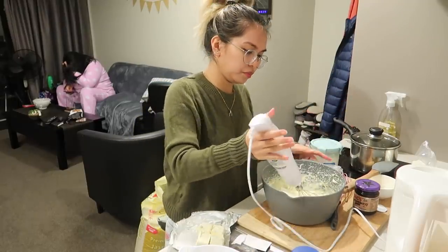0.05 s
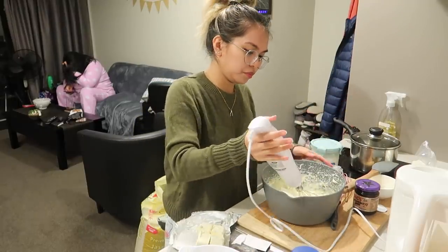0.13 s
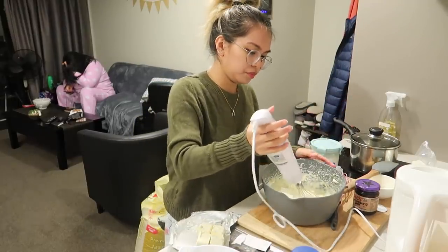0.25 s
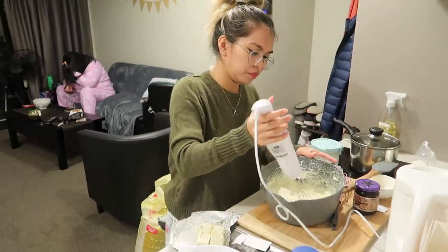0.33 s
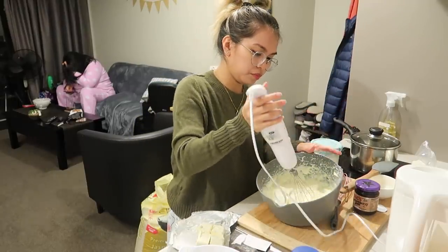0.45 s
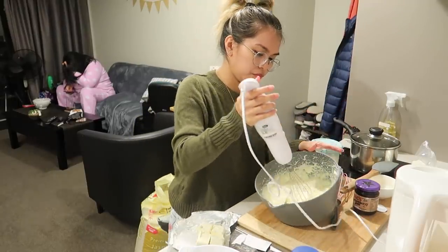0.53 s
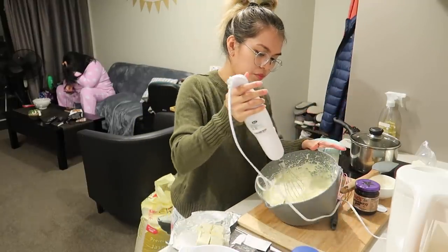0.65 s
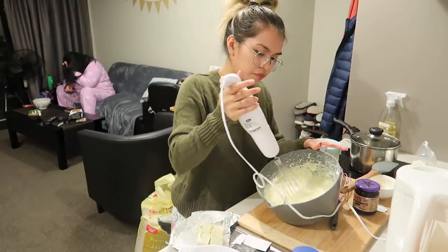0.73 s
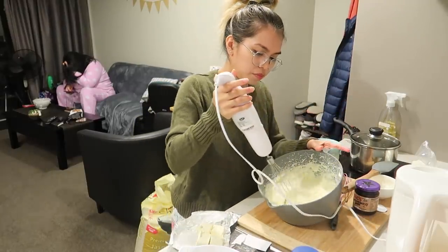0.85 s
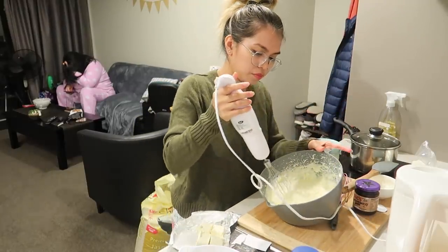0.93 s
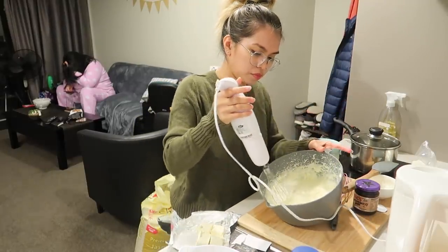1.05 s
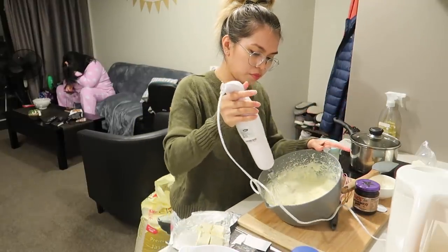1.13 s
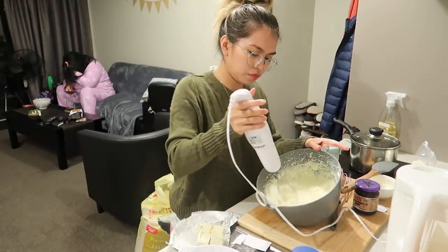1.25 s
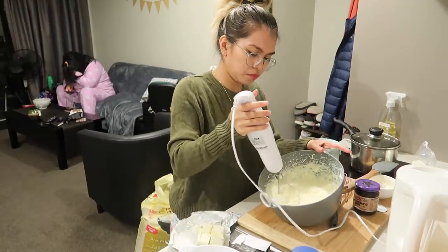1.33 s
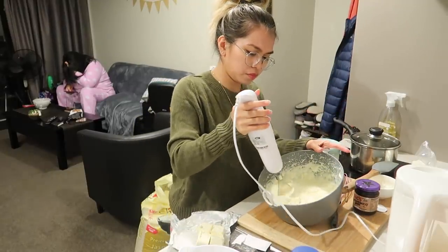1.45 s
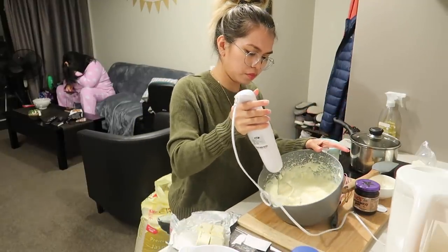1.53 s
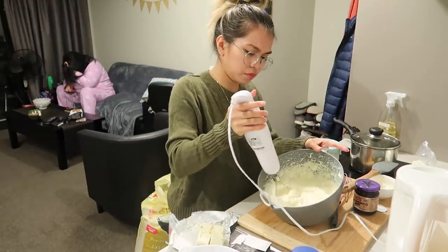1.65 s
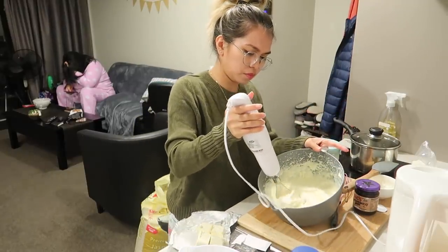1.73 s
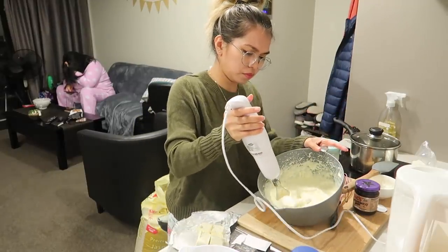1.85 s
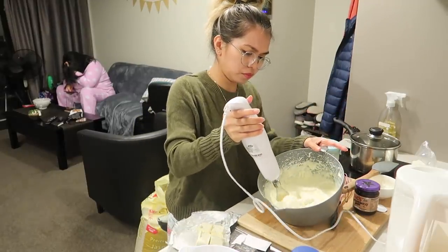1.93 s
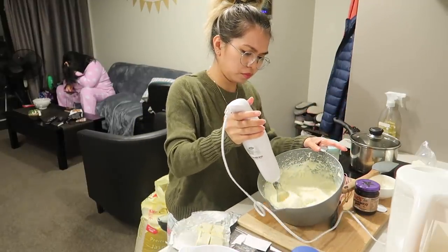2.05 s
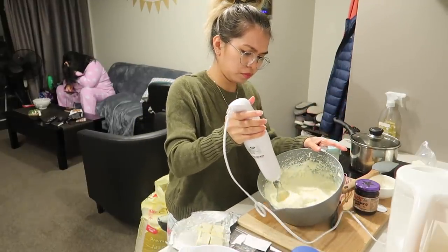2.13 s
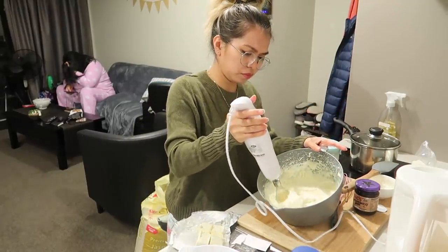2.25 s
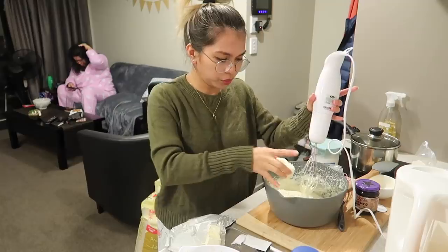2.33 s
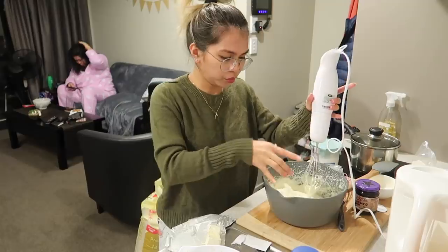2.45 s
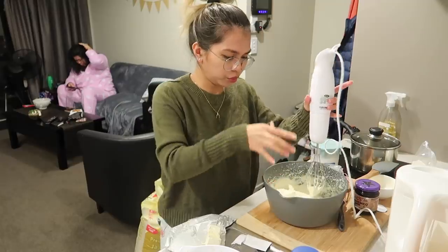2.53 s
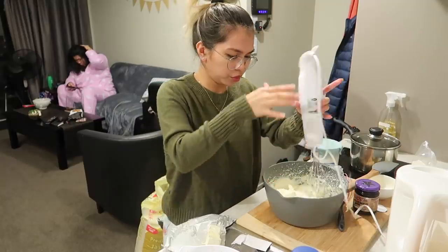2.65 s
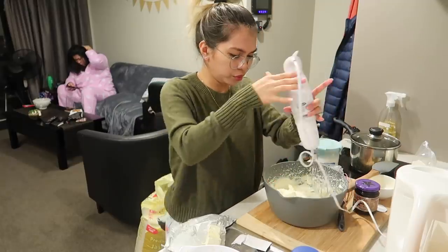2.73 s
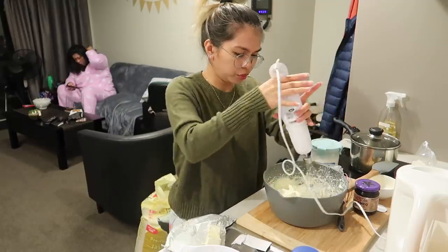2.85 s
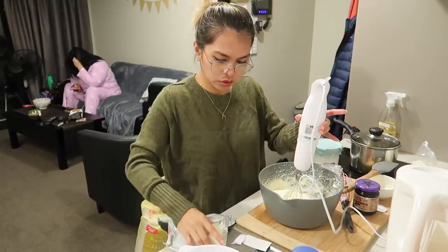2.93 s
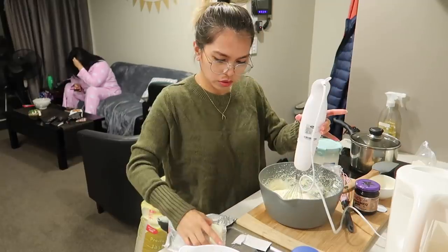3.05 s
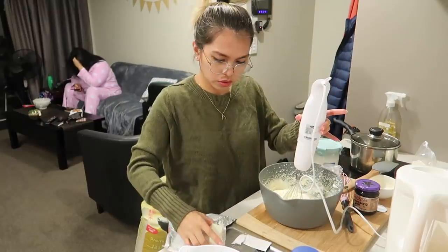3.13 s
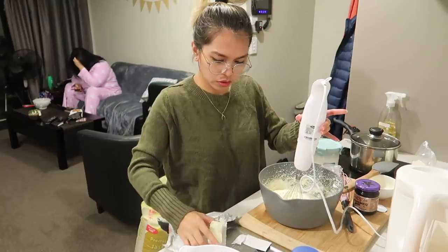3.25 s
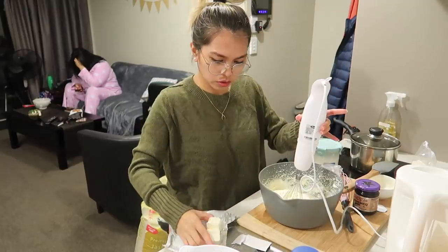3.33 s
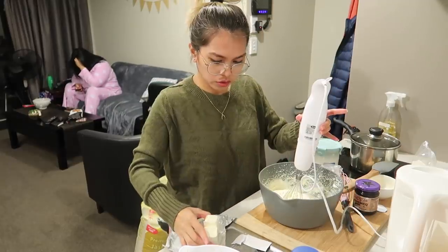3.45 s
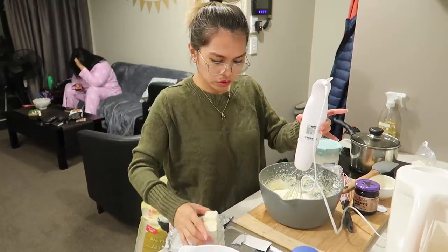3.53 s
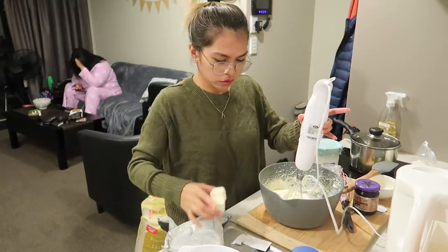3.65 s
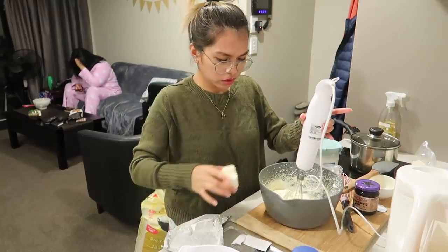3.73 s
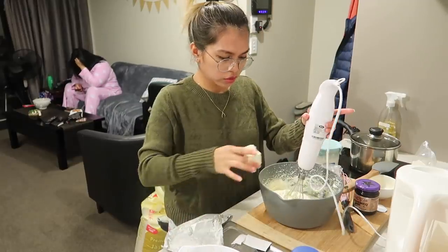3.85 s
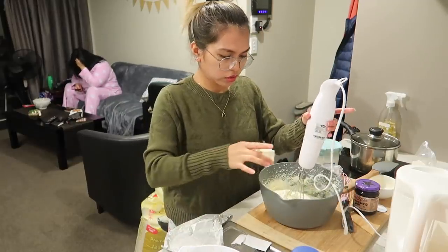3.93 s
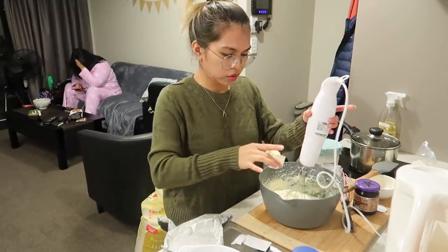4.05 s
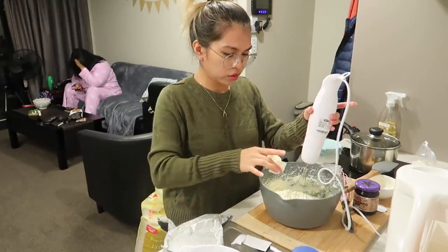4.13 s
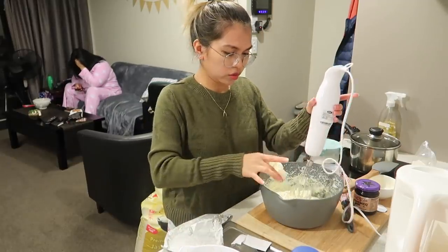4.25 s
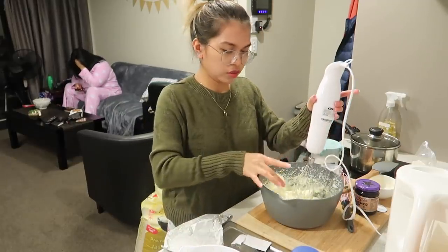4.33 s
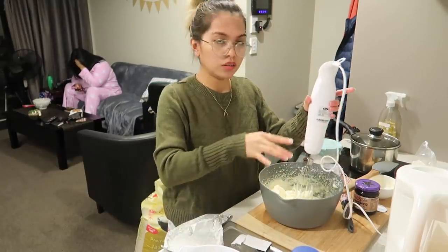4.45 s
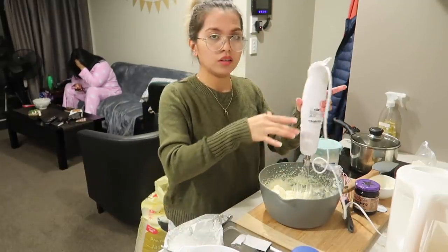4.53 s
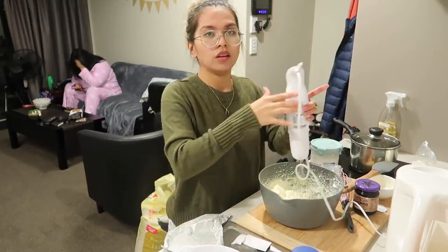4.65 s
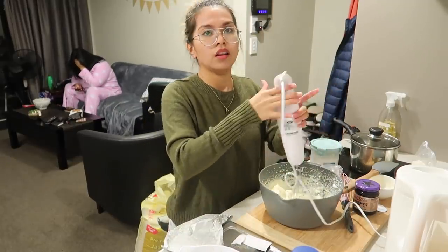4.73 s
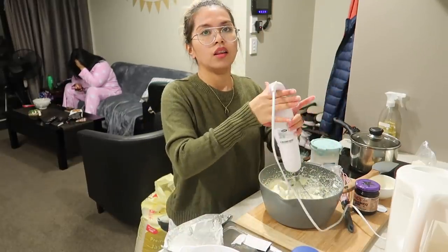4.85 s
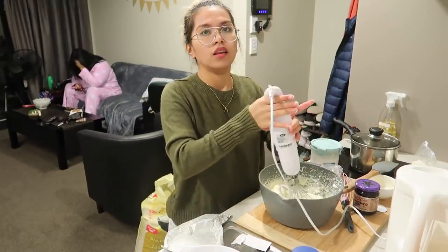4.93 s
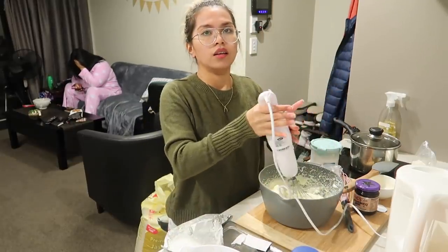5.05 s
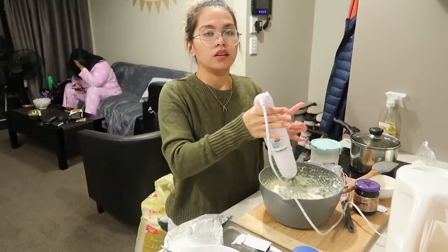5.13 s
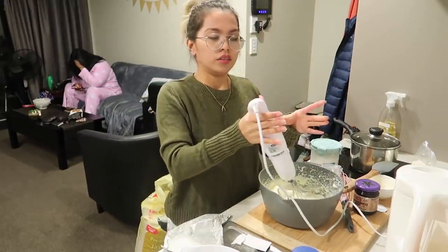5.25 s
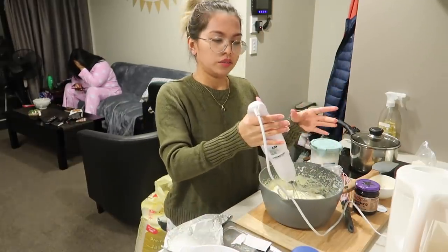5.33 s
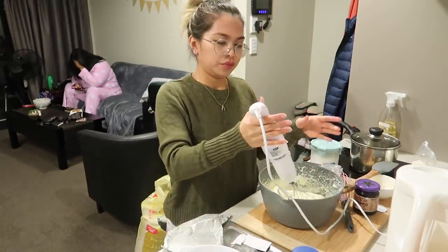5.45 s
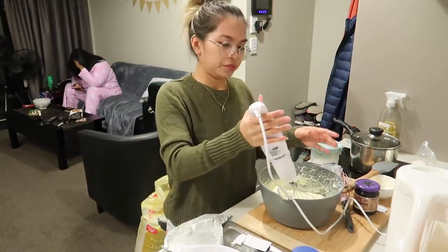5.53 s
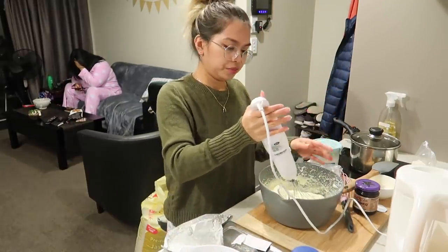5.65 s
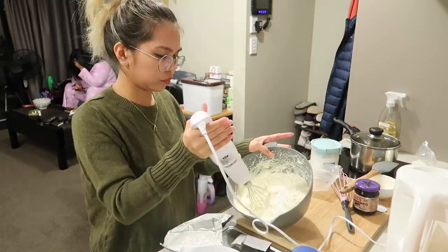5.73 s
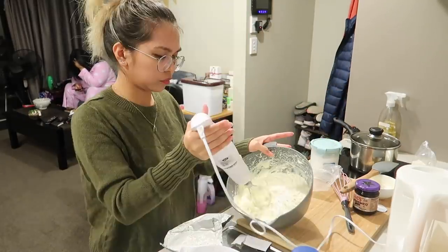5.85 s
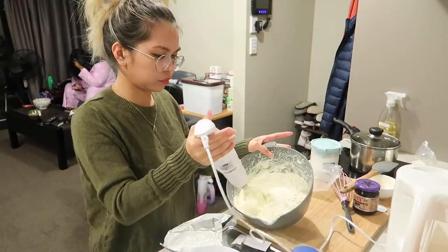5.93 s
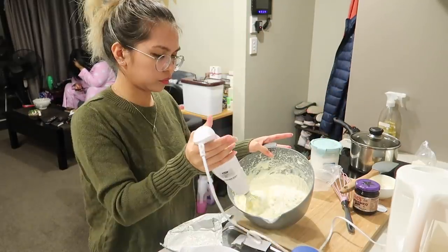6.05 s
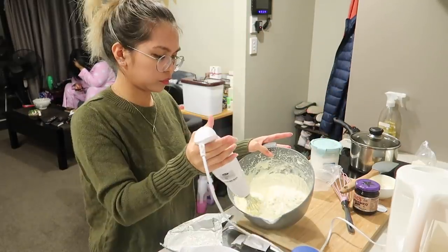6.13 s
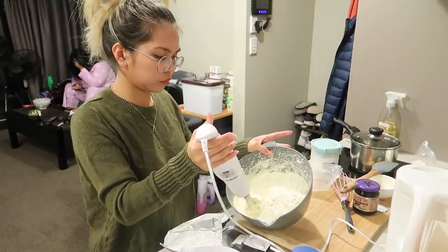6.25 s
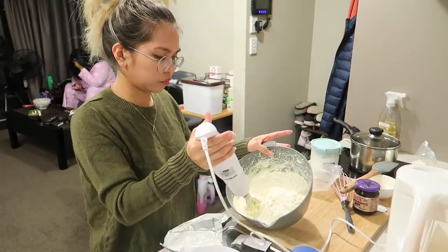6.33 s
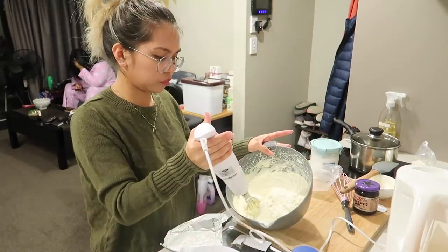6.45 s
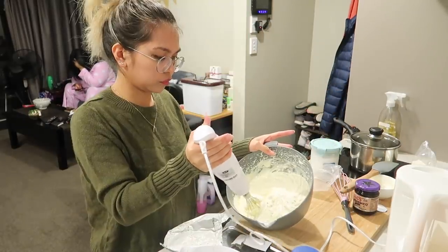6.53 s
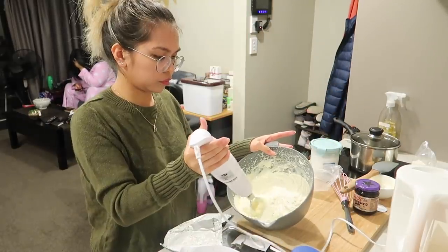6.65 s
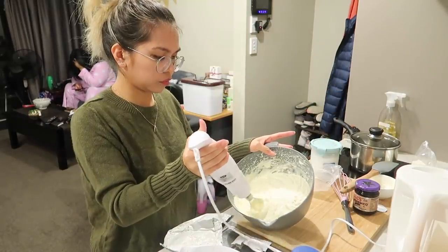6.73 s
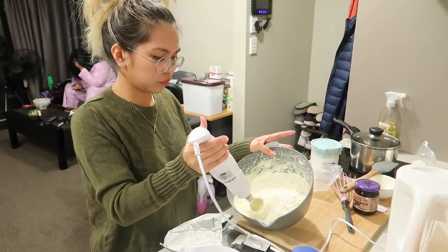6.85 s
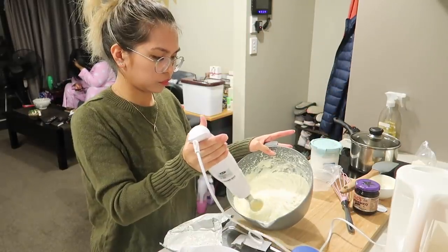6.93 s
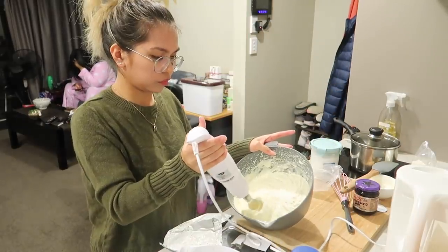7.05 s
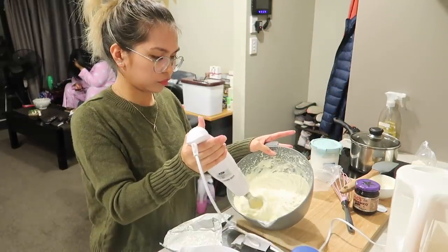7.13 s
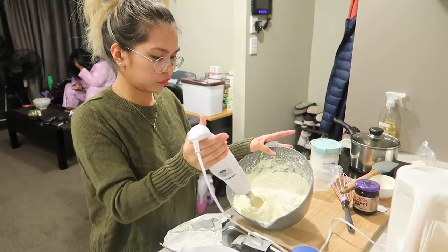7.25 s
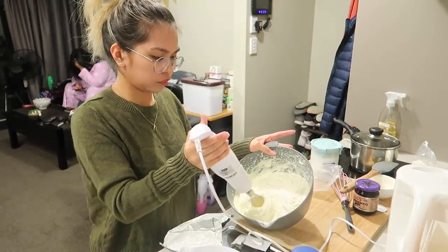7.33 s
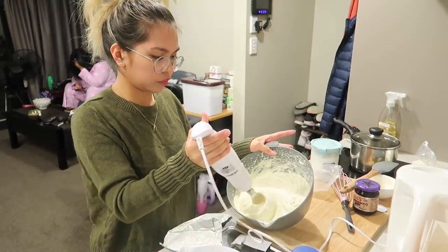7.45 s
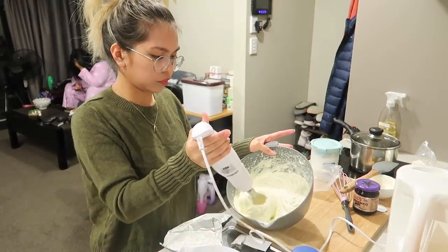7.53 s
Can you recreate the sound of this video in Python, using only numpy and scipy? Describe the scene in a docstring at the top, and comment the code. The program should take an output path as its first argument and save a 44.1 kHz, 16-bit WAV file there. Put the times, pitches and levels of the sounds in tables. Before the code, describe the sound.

Close in a small, short-echoed kitchen, soft plastic taps and cloth rustle precede a stick blender's rising rattly whine over low churning. It stops dead; foil crackles, the whisk knocks the bowl, and dull thuds follow. A firm plastic tap, a very brief motor burst with a gritty squeak, then another steady run lasts to the end. Quiet room air and appliance hum lie underneath.

```python
"""Whisking thick filling in a small kitchen

A stick blender with a whisk beats filling in a bowl: a long run, a brief burst, then another long run.
Clicking gear teeth rattle the plastic housing and whine at the tooth rate; noise makes brush hiss and churning.
Around the runs come plastic taps, knocks on the bowl, soft thuds, brushing cloth and a crackling foil wrapper.
All but the room sound is spread wide with short kitchen echoes, over room air, a faint drone and appliance hum."""
import sys
import numpy as np
from scipy import signal
from scipy.fft import rfft, irfft
from scipy.io import wavfile
from scipy.ndimage import map_coordinates

SR = 44100
rng = np.random.default_rng(int(sys.argv[2]) if len(sys.argv) > 2 else 0)


def dump_mix(stems):
    """Bounce the given channels to the path in sys.argv[1] as a 16-bit WAV at rate SR."""
    frames = np.atleast_2d(stems).T  # one column per channel
    limited = np.clip(frames, -1, 1)  # hard clip at full scale
    pcm = np.round(limited * 32767).astype(np.int16)
    wavfile.write(sys.argv[1], SR, pcm)


N = 334616
TIME = np.arange(N) / SR  # s
FREQ = np.maximum(np.arange(N // 2 + 1) * SR / N, 1)  # Hz
LEFT_RIGHT = np.array([[1], [-1]])  # sign of the side signal in each channel

# Presses of the button. Each row: on in seconds, off in seconds, attack time constant in seconds,
# then settled levels before speed and tilt act: rattle in dB, hiss in dB, churning in dB, bowl hollow in dB.
RUNS = [(1.211, 2.4, 0.05, -21.5, -24, -38.5, -37), (5.92, 6.115, 0.055, -19.5, -26.5, -42.5, -26),
        (6.709, 7.7, 0.066, -21.5, -24.5, -37, -28)]
# Motor speed, one list a run. Each row: time in seconds, gear teeth per second in Hz, whine level in dB.
MESH = [
    [(1.213, 479.8, -42), (1.25, 962, -17), (1.305, 1395, -17.5), (1.38, 1572, -19), (1.45, 1738, -25),
     (1.51, 1927, -19), (1.62, 2021, -19.5), (1.75, 2087, -23.5), (1.87, 2135, -22.5), (2.06, 2103, -20),
     (2.16, 2131, -27.5), (2.38, 2167, -27)],
    [(5.919, 420.7, -27), (5.97, 897.7, -26), (6.03, 1299, -18), (6.075, 1392, -29), (6.11, 1229, -19.5),
     (6.2, 1258, -12)],
    [(6.702, 401.7, -40), (6.74, 789, -22), (6.785, 1114, -12.5), (6.83, 1316, -17), (6.9, 1596, -20),
     (7.0, 1764, -22.5), (7.12, 1743, -24.5), (7.3, 1794, -20), (7.48, 1826, -19), (7.59, 1810, -23.5)],
]
# Teeth that pass in one turn of the motor, of the middle wheel and of the whisk (counts).
TEETH_PER_TURN = (12, 36, 122)
# The first run breaks off dead, echo and all: from in seconds, to in seconds.
BREAK_S = (2.378, 2.9)
TURNING_HZ = 405.5  # above this mesh rate the motor counts as running
MOTOR_SHAKE_DB, WHEEL_SHAKE_DB, SHAKE_AT_HZ = -41.5, -54, 2170  # imbalance, at this mesh rate


def blender():
    """The motor turns the whisk through a toothed wheel; the shared tooth count drives every layer."""
    runs = sum(press(mesh, *run) for mesh, run in zip(MESH, RUNS))
    mesh_hz, rattle_gain, whine_gain, hiss_gain, churn_gain, hollow_gain, torque = runs
    unsteady = 1 + .008 * walk(25) + .003 * walk(4)
    teeth = np.cumsum(mesh_hz * unsteady) / SR
    motor, wheel, whisk = (2 * np.pi * teeth / count for count in TEETH_PER_TURN)
    sweep = np.sin(whisk + .4 * walk(3)) + .6 * np.sin(2 * whisk + .7 * walk(4))
    load = undb(0.73 * walk(35) + 0.93 * np.sin(wheel))
    clicks = running_unit(tooth_clicks(teeth, scatter_db=3.0, pattern_db=1.0, slack=.15), mesh_hz)
    sound = gear_rattle(mesh_hz, clicks, load, torque) * rattle_gain
    sound += gear_whine(mesh_hz, teeth, motor, wheel, whisk, sweep) * whine_gain
    sound += brush_hiss(mesh_hz, clicks, load, motor) * hiss_gain
    sound += churning(mesh_hz, sweep) * churn_gain
    sound += bowl_hollow(mesh_hz, load) * hollow_gain
    # imbalance grows with the square of speed
    shake = undb(MOTOR_SHAKE_DB) * np.sin(motor) + undb(WHEEL_SHAKE_DB) * np.sin(wheel)
    sound += (mesh_hz / SHAKE_AT_HZ) ** 2 * shake
    before_break = np.clip((BREAK_S[0] - TIME) / 0.0049, 0, 1)
    heard = (TIME > RUNS[0][0]) * before_break + (TIME > BREAK_S[1])
    return kitchen(sound + scrapes(), wet_db=-11, t60=0.21) * heard


COAST_S, COAST_POWER = .4, 4.6  # friction stops it in this time; loudness falls as this power of speed
SLACK_POWER = 3.7  # coasting gears lose their mesh, so the whine fades by this further power
SURGE_DB, SURGE_S = 11.5, 0.18  # starting torque drives the gears harder, then eases
HISS_SURGE_DB = 8.5  # starting current makes the brushes hiss more
HISS_POWER, CHURN_POWER = 1, 1.45  # hiss and churning are scaled by these powers of speed
STIFF_DB, STIFF_AT_S, STIFF_WIDTH_S = 9.5, 0.143, 0.16  # resting filling churns louder until it loosens


def press(mesh, on, off, attack_s, rattle_db, hiss_db, churn_db, hollow_db):
    """One run: mesh rate, gains of rattle, whine, hiss, churning and hollow, and starting torque."""
    s, hz, whine_db = np.transpose(mesh)
    age = np.clip(TIME - on, 0, off + COAST_S - on)
    coast = np.clip(1 - (TIME - off) / COAST_S, 0, 1) * (TIME > on)
    mesh_hz = np.interp(TIME, s, hz) * coast
    speed = mesh_hz / hz.max()
    drive = (1 - np.exp(-age / attack_s)) * coast ** COAST_POWER
    torque = np.exp(-age / SURGE_S)
    stiff = np.exp(-((age - STIFF_AT_S) / STIFF_WIDTH_S) ** 2)
    return np.array([mesh_hz,
                     drive * undb(rattle_db + SURGE_DB * torque),
                     drive * coast ** SLACK_POWER * undb(np.interp(TIME, s, whine_db)),
                     drive * speed ** HISS_POWER * undb(hiss_db + HISS_SURGE_DB * torque),
                     speed ** CHURN_POWER * undb(churn_db + STIFF_DB * stiff),
                     drive * undb(hollow_db),
                     drive * torque])


def tooth_clicks(teeth, scatter_db, pattern_db, slack, count=36):
    """One click a tooth: each wheel tooth has its own strength, and backlash makes it early or late."""
    at = np.flatnonzero(np.diff(np.floor(teeth)) > 0)
    wheel = rng.standard_normal(count)[np.arange(len(at)) % count]
    size, late = noise()[at], noise()[at]
    place = at + slack * late / np.diff(teeth)[at]
    place = np.clip(place, 0, N - 1).astype(int)
    strength = undb(scatter_db * size + pattern_db * wheel)
    sign = np.sign(noise()[at] + wheel)
    return np.bincount(place, strength * sign, N)


# Resonances of housing and bowl. Each row: frequency in Hz, width in Hz, lift in dB.
HOUSING = [(420, 37, 7), (609, 73, 8.5), (976, 32, 6), (1465, 81, 3.5), (1760, 120, 6), (1954, 46.8, 5.5),
           (2130, 40, 1.5), (2270, 37, 6.5), (2730, 48, 3.5), (4295, 330, 5), (4413, 90, 8), (5960, 130, 8)]


def housing_lift():
    """Resonances of housing and bowl as a lift in dB at every frequency."""
    return sum(db / (1 + (2 * (FREQ - hz) / width) ** 2) for hz, width, db in HOUSING)


# Broad colour of the gear sound. Each row: frequency in Hz, relative level in dB.
RATTLE = [(200, -25.5), (400, -15), (560, -6), (750, -3), (880, -8.5), (1000, -3), (1400, -2.5),
          (2000, 0.5), (2450, 0.5), (2750, -2.5), (3100, -7.5), (3800, -12.5), (6000, -49.5)]
CLACKS_PER_S, CLACK_DB = 30, 22.5  # the whisk knocks in its loose coupling; level over the teeth's rms
# grip and filling keep shifting the resonances: (rough share of their frequency, shifts per s)
WAVER_SHARE, WAVER_RATE = .008, 9
# slower teeth strike softer: below this mesh rate the rattle tips to under the edge
SOFT_UNDER_HZ, SOFT_POWER, SOFT_EDGE_HZ = 1930, 0.84, 1850
BITE_DB = 1.5  # starting torque bites harder and brightens the rattle


def gear_rattle(mesh_hz, clicks, load, torque):
    """Tooth clicks and loose clacks excite the housing; faster, harder-driven teeth sound brighter."""
    clacks = (rng.random(N) < CLACKS_PER_S / SR) * np.sign(noise()) * undb(CLACK_DB)
    blows = (clicks + clacks) * load
    rattle = waver(colour(blows, contour(RATTLE) + housing_lift()), WAVER_SHARE, WAVER_RATE)
    rattle = running_unit(rattle, mesh_hz)
    dull = irfft(rfft(rattle) / (1 + (FREQ / SOFT_EDGE_HZ) ** 6), N)
    hard = (np.maximum(mesh_hz, TURNING_HZ) / SOFT_UNDER_HZ) ** SOFT_POWER * undb(BITE_DB * torque)
    return dull / np.sqrt(hard) + (rattle - dull) * hard


# Partials of the whine at 1, 2, 3 times the mesh rate: level in dB, relative to one another.
WHINE_PARTIALS_DB = [2, -6.5, -3.5]
WHINE_HOUSING_SHARE = .5  # how much of the housing's resonance the whine takes on
WHINE_FLUTTER_DB = 0.5  # swing with each sweep of the whisk
# phase swing with motor and wheel, and jitter from backlash (radians at full speed)
MOTOR_WOBBLE, WHEEL_WOBBLE, BACKLASH_JITTER = 1.05, .6, .55


def gear_whine(mesh_hz, teeth, motor, wheel, whisk, sweep):
    """Shafts run out of true and give sidebands; partials flare as they cross housing resonances."""
    wobble = MOTOR_WOBBLE * np.sin(motor + .6 * walk(8))
    wobble += WHEEL_WOBBLE * np.sin(wheel + .6 * walk(5)) + .9 * np.cos(whisk)
    wobble = (wobble + BACKLASH_JITTER * walk(170)) * mesh_hz / mesh_hz.max()
    phase = 2 * np.pi * teeth + wobble
    partials = sum(undb(db) * np.sin(k * phase) for k, db in enumerate(WHINE_PARTIALS_DB, 1))
    flutter_db = WHINE_FLUTTER_DB * sweep + 1.2 * np.sin(wheel) + 1.8 * np.sin(motor) + 3.8 * walk(69.1)
    body = contour(RATTLE) + WHINE_HOUSING_SHARE * housing_lift()
    return running_unit(colour(partials * undb(flutter_db), body), mesh_hz)


# Colour of the motor brushes. Each row: frequency in Hz, relative level in dB.
HISS = [(2000, -33), (3000, -7.5), (3500, -8.5), (4100, -1), (5000, -1), (5700, 1.5), (7000, -1),
        (8200, -7.5), (9000, -7), (9700, -13), (10800, -11.5), (12000, -13), (13000, -18), (14200, -29)]


def brush_hiss(mesh_hz, clicks, load, motor):
    """Brush noise pulses twice a motor turn, with a little tooth click, through the housing."""
    brushes = noise() * undb(2 * np.sin(2 * motor)) + 0.26 * clicks
    hiss = colour(brushes * load, contour(HISS) + housing_lift())
    return running_unit(waver(hiss, WAVER_SHARE / 2, WAVER_RATE), mesh_hz)


# Colour of the beaten filling. Each row: frequency in Hz, relative level in dB.
CHURN = [(30, -35), (48, -10), (62, 6.5), (90, -11), (135, -3.5), (220, -7), (290, 0.5), (340, -2),
         (420, 4), (600, -34.5)]
CHURN_FLUTTER_DB = 1.5  # swing with each sweep of the whisk


def churning(mesh_hz, sweep):
    """Filling churns as low noise that swells with each sweep of the whisk."""
    flutter = undb(1.35 * walk(17) + CHURN_FLUTTER_DB * sweep)
    return running_unit(colour(noise() * flutter, contour(CHURN)), mesh_hz)


# Resonances of the air in the bowl. Each row: frequency in Hz, width in Hz, relative level in dB.
HOLLOW = [(604.6, 49, 3), (1156, 160, -0.5)]


def bowl_hollow(mesh_hz, load):
    """Air in the bowl resonates to noise under the gear load, at each run's own level for the bowl's tilt."""
    cavity = sum(undb(db) / (1 + (2 * (FREQ - hz) / width) ** 4) for hz, width, db in HOLLOW)
    return running_unit(irfft(rfft(noise() * load) * cavity, N), mesh_hz)


# Wires grazing the bowl. Each row: middle in seconds, length in seconds, level in dB.
SCRAPES = [(1.535, 0.01824, -31.5), (5.995, 0.014, -38), (6.092, 0.017, -17.5), (6.768, 0.013, -27),
           (6.818, 0.02, -36), (6.915, .014, -41), (7.3, 0.015, -33)]
# Colour of the graze. Each row: frequency in Hz, relative level in dB.
SCRAPE_COLOUR = [(5000, -30), (9000, -8), (10700, 5.5), (12000, 6), (13300, -6), (14500, -9.5)]


def scrapes():
    """A spinning wire grazes the bowl with a thin, gritty squeak."""
    grit = noise() * undb(4.0 * walk(303))
    return unit(colour(grit, contour(SCRAPE_COLOUR))) * swells(SCRAPES)


# Taps and clicks of the plastic handle. Each row: start in seconds, level in dB before colouring,
# top of the body in Hz, treble against body in dB before the lifts below, contact build-up in seconds.
TAPS = [(0.051, -21.5, 1160, -30.5, 0.0018), (0.55, -27, 4000, -18, 0.0022),
        (0.779, -30, 1930, -36, 0.0025), (0.916, -23.5, 1280, -40, 0.0029), (1.204, -43, 3930, -8, 0.0011),
        (2.541, -39.5, 4000, -14, 0.0046), (2.983, -29.5, 4030, -25.5, 0.0027),
        (3.179, -27.5, 4500, -28, 0.003), (3.213, -31.5, 4500, -26, 0.0073),
        (3.311, -31, 4400, -16, 0.0018), (3.477, -35.5, 4010, -24, 0.0035), (4.472, -35, 4500, -13, 0.0034),
        (4.872, -37.5, 4000, -18, 0.0098), (5.017, -14.5, 2470, -31.5, 0.00032),
        (5.379, -35, 3993, -34, 0.00087), (5.902, -37.5, 4008, -16, 0.00067),
        (5.923, -20, 2600, -26, 0.003), (6.703, -23, 3006, -24, 0.0013)]
# Colour of taps, also lent to cloth. Each row: frequency in Hz, relative level in dB.
TAP_COLOUR = [(71, -44), (120, -7), (253, -1), (520, -6), (852, -8.5), (1140, -5), (1290, -8), (1870, -5),
              (2500, -7.5), (3930, -14.5), (6810, -23), (10300, -34.5), (13000, -33)]
TAP_T60_S, CRACK_T60_S = 0.085, 0.002
BODY_LIFT_DB, TREBLE_LIFT_DB = 6.0, 28.0


def taps():
    """Short cracks of plastic: each contact builds, then decays, with its own share of treble."""
    t = TIME[:SR // 4]
    dull, bright = np.zeros(N), np.zeros(N)
    for s, db, top_hz, treble_db, build_s in TAPS:
        after = np.maximum(t - build_s, 0)
        build = np.minimum(t / max(build_s, 1 / SR), 1)
        crack = rng.standard_normal(len(t)) * build * (fade(after, TAP_T60_S) + 0.15 * fade(after, CRACK_T60_S))
        lowpass = signal.butter(3, top_hz, fs=SR, output="sos")
        add(dull, s, signal.sosfilt(lowpass, crack) * undb(db))
        add(bright, s, crack * undb(db + treble_db))
    body = contour(TAP_COLOUR)
    treble = body - 10 * np.log10(1 + (4000 / FREQ) ** 6)  # high-pass at 4 kHz
    return undb(BODY_LIFT_DB) * colour(dull, body) + undb(TREBLE_LIFT_DB) * colour(bright, treble)


# Knocks that ring the bowl; the first pair comes as a hand reaches for the wrapper. Each row: start in seconds,
# peak in dB before the room.
KNOCKS = [(3.0215, -20.5), (3.026, -23), (3.49, -34), (3.519, -30.5), (3.556, -35.5), (3.591, -40)]
# Ring of the bowl. Each row: frequency in Hz, relative level in dB, t60 in seconds.
BOWL = [(160, -19.5, 0.28), (277, -6.5, 0.14), (411, -8, 0.098), (600, -10.5, 0.12), (1134, -20, 0.3),
        (1445, -9, 0.09), (1680, -6, 0.042), (1795, 4, 0.058), (1854, -6, 0.22), (1930, -6, 0.06),
        (2620, -17, 0.057), (4080, -10.5, 0.031)]


def knocks():
    """Blows on the bowl ring its modes."""
    out, t = np.zeros(N), TIME[:SR // 3]
    ring = sum(undb(db) * np.sin(2 * np.pi * hz * t) * fade(t, t60) for hz, db, t60 in BOWL)
    for s, db in KNOCKS:
        # one sharp blow, then faint rubbing
        contact = 0.045 * rng.standard_normal(len(t)) * fade(t, 0.042)
        contact[0] = 1
        knock = signal.fftconvolve(contact, ring)[:len(t)]
        add(out, s, undb(db) * knock / np.abs(knock).max())
    return out


# Sharpest crinkles of the foil wrapper. Each row: start in seconds, level in dB before colouring.
CRINKLES = [(2.943, -44), (3.026, -36), (3.13, -39), (3.1494, -40), (3.213, -33), (3.405, -42.5),
            (3.482, -34), (3.913, -42.5)]
# Colour of foil. Each row: frequency in Hz, relative level in dB.
CRINKLE_COLOUR = [(800, -27.5), (2500, -17), (4500, 0.5), (7000, -3), (9500, -2.5), (13000, -3),
                  (15000, -17)]
# fine crackle while the foil is handled: middle, length, level before colouring
WRAPPER_S, WRAPPER_LENGTH_S, WRAPPER_DB = 3.35, 0.99, -70


def foil_wrapper():
    """Foil buckles in tiny snaps: cubed noise is spiky, in sharp bursts over a fine crackle."""
    foil, t = np.zeros(N), TIME[:SR // 6]
    for s, db in CRINKLES:
        snaps = unit(rng.standard_normal(len(t)) ** 3)
        add(foil, s, undb(db) * snaps * fade(t, 0.055))
    handled = np.exp(-(2 * (TIME - WRAPPER_S) / WRAPPER_LENGTH_S) ** 4)
    foil += unit(noise() ** 3) * undb(WRAPPER_DB + 3.4 * walk(13)) * handled
    return colour(foil, contour(CRINKLE_COLOUR))


# Wrapper squeezed and peeled back. Each row: middle in seconds, length in seconds, level in dB.
CRUMPLES = [(3.187, 0.02, -42), (3.23, 0.06, -59), (3.495, 0.035, -53), (3.56, 0.11, -47.5)]
# Colour of squeezed foil. Each row: frequency in Hz, relative level in dB.
CRUMPLE_COLOUR = [(300, -22), (700, -6), (1800, 0), (3500, -3), (6000, -12), (12000, -26)]
CRUMPLE_SNAPS_PER_S, CRUMPLE_SCATTER_DB = 500, 5


def crumpling():
    """Squeezed foil crackles: many faint snaps and a few strong ones."""
    size = undb(CRUMPLE_SCATTER_DB * np.minimum(rng.exponential(size=N), 3))
    snaps = (rng.random(N) < CRUMPLE_SNAPS_PER_S / SR) * np.sign(noise()) * size
    return unit(colour(snaps, contour(CRUMPLE_COLOUR))) * swells(CRUMPLES)


# Sleeves and hands brushing past. Each row: middle in seconds, length in seconds, level in dB.
BRUSHES = [(0.06, 0.19, -57), (0.583, 0.063, -51), (2.9, 0.14, -59.5), (3.03, 0.041, -49),
           (3.2, 0.33, -52.5), (3.548, 0.2, -50), (4.19, 0.26, -71), (4.484, 0.038, -57.5),
           (4.84, 0.25, -58.5), (5.06, 0.097, -55), (5.68, 0.29, -61)]
RUSTLE_DB, RUSTLE_SWING_DB = -69, 4.5  # clothes keep rustling faintly


def cloth_brushes():
    """Uneven cloth noise: each brush of a sleeve or hand swells and dies away over a faint rustle."""
    cloth = unit(colour(noise() * undb(3.5 * walk(30) + 2.0 * walk(250)), contour(TAP_COLOUR)))
    return cloth * (swells(BRUSHES) + undb(RUSTLE_DB + RUSTLE_SWING_DB * walk(6)))


# Soft blows on the worktop. Each row: start in seconds, level in dB, pitch in Hz, t60 in seconds.
THUDS = [(0.325, -41, 60, 0.38), (0.918, -42.5, 174, 0.029), (0.948, -36, 77.8, 0.45),
         (2.547, -37.5, 64, 0.32), (3.011, -35, 180, 0.18), (3.409, -31, 160, 0.13),
         (3.408, -29.5, 287, 0.093), (4.475, -29, 268, 0.07), (4.501, -36.5, 55.7, .35),
         (5.018, -33.5, 286, 0.1)]


def thuds():
    """Soft blows: a low, damped swing with a little dull noise."""
    out, t = np.zeros(N), TIME[:SR // 2]
    for s, db, hz, t60 in THUDS:
        band = signal.butter(2, [hz / 2, hz * 2], "band", fs=SR, output="sos")
        dull = unit(signal.sosfilt(band, rng.standard_normal(len(t))))
        add(out, s, undb(db) * (np.sin(2 * np.pi * hz * t) + 0.27 * dull) * fade(t, t60))
    return out


# Colour of the room air. Each row: frequency in Hz, relative level in dB.
ROOM_TONE = [(15, -36.5), (25, -10.5), (80, -1.5), (155, -10), (172, -9.5), (202, -5.5), (325, -12.5),
             (412, -9.5), (582, -20), (700, -15), (778, -19), (1470, -21), (2070, -25.5), (4230, -29),
             (13900, -46)]
# Stereo width of the room air. Each row: frequency in Hz, side minus mid in dB.
TONE_WIDTH = [(60, -27), (110, -9.5), (220, -1.5), (600, 0.5), (12000, -0.5)]
# Appliance hum. Each row: frequency in Hz, rms level in dB.
HUM = [(49.5, -62.5), (71.5, -58), (100, -61), (150, -65.5)]
ROOM_TONE_DB = -52.5  # of the mid signal
DRONE_HZ, DRONE_WIDTH_HZ, DRONE_DB, DRONE_SWING_DB = 417, 73, -63.5, 4


def room_tone():
    """Steady room air, nearly mono in the deep bass, with central hum and a drone that comes and goes."""
    mid = colour(noise(), contour(ROOM_TONE))
    side = colour(noise(), contour(ROOM_TONE) + contour(TONE_WIDTH))
    air = (mid + LEFT_RIGHT * side) / np.std(mid) * undb(ROOM_TONE_DB + 0.63 * walk(3.95))
    drone = walk(DRONE_WIDTH_HZ / 2) * np.sin(2 * np.pi * DRONE_HZ * TIME)
    drone = unit(drone * undb(DRONE_SWING_DB * walk(5.1))) * undb(DRONE_DB)
    hum = sum(undb(db) * np.sqrt(2) * np.sin(2 * np.pi * hz * TIME + 0.76 * walk(2.2)) for hz, db in HUM)
    return air + drone + hum


# Stereo spread of the direct sound. Each row: frequency in Hz, phase by which left leads in radians.
SPREAD_PHASE = [(60, -.05), (250, -.22), (700, -.12), (2200, -.18), (3400, -.15), (4500, -1.05),
                (5700, -1.6), (7000, -2.1), (8500, -2.45), (10000, -2.95), (12000, -2.8)]
# Stereo width of the echoes. Each row: frequency in Hz, side minus mid in dB.
ECHO_WIDTH = [(60, -25), (250, -16), (1200, -22), (2500, -10), (3400, -4), (4500, 2), (6000, 2),
              (7500, 4.5), (9000, 2), (9900, -11), (12000, -10)]


def kitchen(x, wet_db, t60):
    """Direct sound is spread wide, drifting towards opposite phase in the treble; walls add a diffuse tail."""
    tail = fade(TIME, t60) * (TIME > .003)
    mid, side = (rfft(noise() * tail) / np.sqrt(np.sum(tail ** 2)) for _ in range(2))
    direct = np.exp(.5j * LEFT_RIGHT * contour(SPREAD_PHASE))
    echoes = undb(wet_db) * direct * (mid + LEFT_RIGHT * side * undb(contour(ECHO_WIDTH)))
    balance = undb(-.35 * LEFT_RIGHT)  # right slightly louder
    return irfft(rfft(x) * (direct + echoes), N) * balance / np.sqrt(1 + undb(2 * wet_db))


def undb(db):
    """Decibels to gain."""
    return 10 ** (np.asarray(db) / 20)


def unit(x):
    """Scale to rms 1."""
    return x / np.sqrt(np.mean(x ** 2))


def running_unit(x, mesh_hz):
    """Scale to rms 1 over the time the motor runs."""
    return x / np.sqrt(np.mean(x[mesh_hz > TURNING_HZ] ** 2))


def contour(points):
    """(Hz, value) points joined on a log-frequency axis."""
    hz, value = np.transpose(points)
    return np.interp(np.log(FREQ), np.log(hz), value)


def colour(x, db):
    """Causal minimum-phase filter with the given gain in dB at every frequency."""
    cepstrum = irfft(np.log(undb(db)), N)
    cepstrum[1:N // 2] *= 2
    cepstrum[N // 2 + 1:] = 0
    return irfft(rfft(x) * np.exp(rfft(cepstrum)), N)


def waver(x, share, rate):
    """Let all resonances drift up and down together by slowly bending time."""
    shift_s = share * walk(rate) / (np.pi * rate)
    return map_coordinates(x, [(TIME + shift_s) * SR], mode="mirror")


def noise():
    """White noise."""
    return rng.standard_normal(N)


def walk(rate):
    """Smooth random wander with spread 1, mostly slower than the rate in Hz."""
    return unit(irfft(rfft(noise()) / (1 + (FREQ / rate) ** 4), N))


def fade(t, t60):
    """Exponential decay by 60 dB in t60 seconds."""
    return np.exp(-np.log(1000) * t / max(t60, 1e-3))


def swells(rows):
    """Gain of smooth swells, each given as (middle s, length s, level dB)."""
    return sum(undb(db) * np.exp(-(2 * (TIME - s) / length) ** 2) for s, length, db in rows)


def add(track, s, sound):
    """Mix a sound in at a time in seconds."""
    start = int(s * SR)
    track[start:start + len(sound)] += sound[:N - start]


def scene():
    """The blender and the small sounds of work in one room."""
    small = taps() + knocks() + foil_wrapper() + crumpling() + cloth_brushes()
    small = kitchen(small, wet_db=-10.5, t60=0.3653)
    return blender() + small + kitchen(thuds(), wet_db=-4.0, t60=0.3) + room_tone()


CEILING = 1  # peaks are rounded towards this level, full scale being 1
TOP_HZ = 14300


def record(dry):
    """The recorder rounds the loudest peaks and cuts the top."""
    rounded = dry / (1 + (dry / CEILING) ** 4) ** (1 / 4)
    return signal.sosfilt(signal.ellip(8, .2, 70, TOP_HZ, fs=SR, output="sos"), rounded)


dry = scene()
out = record(dry)
dump_mix(out)
```